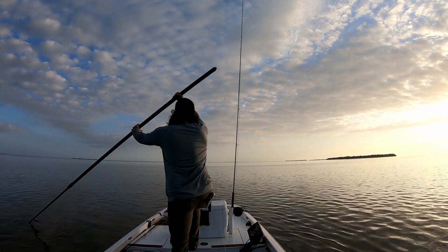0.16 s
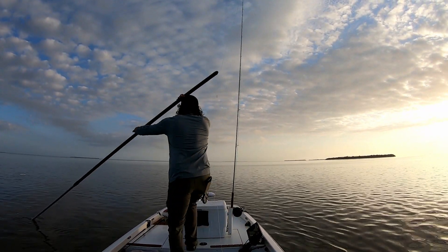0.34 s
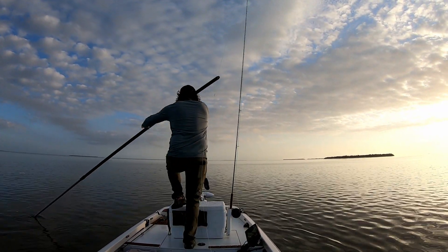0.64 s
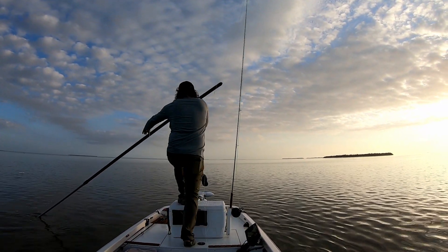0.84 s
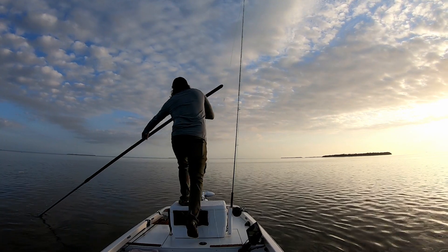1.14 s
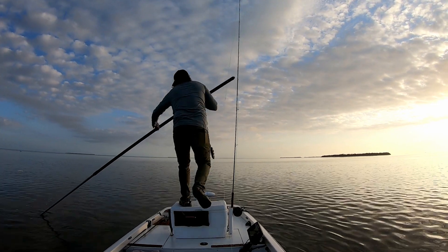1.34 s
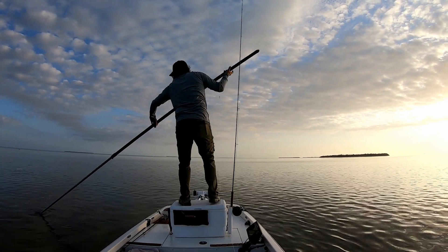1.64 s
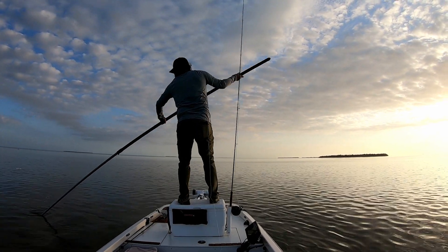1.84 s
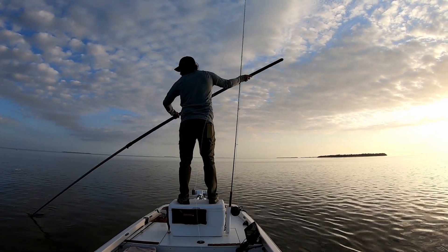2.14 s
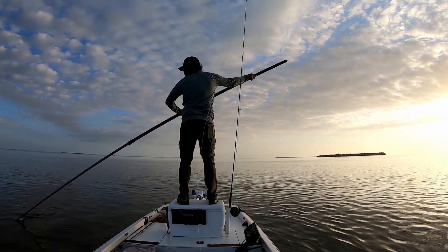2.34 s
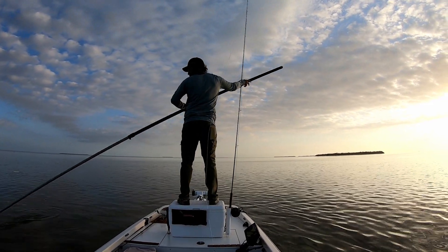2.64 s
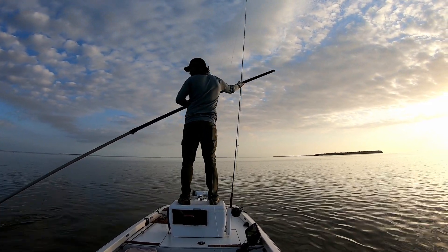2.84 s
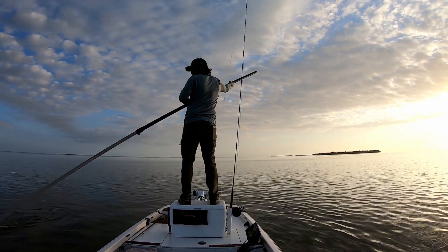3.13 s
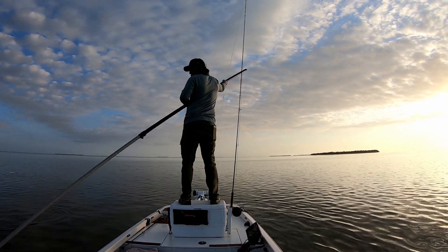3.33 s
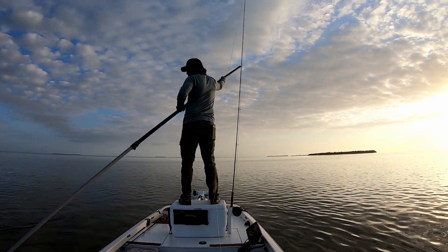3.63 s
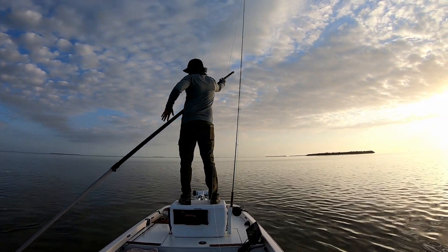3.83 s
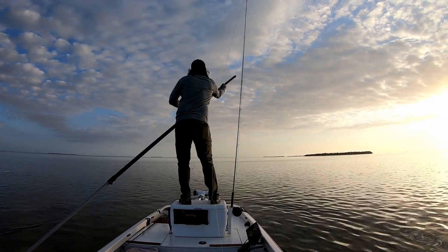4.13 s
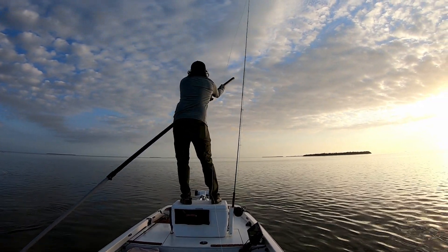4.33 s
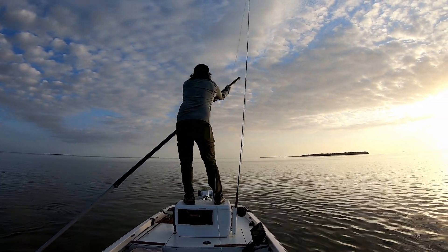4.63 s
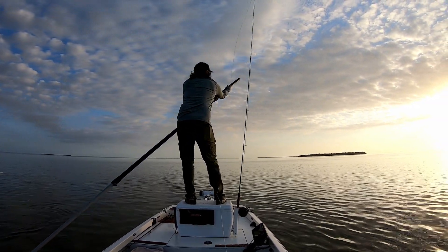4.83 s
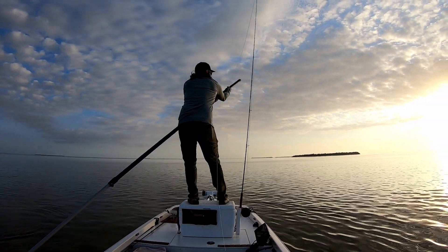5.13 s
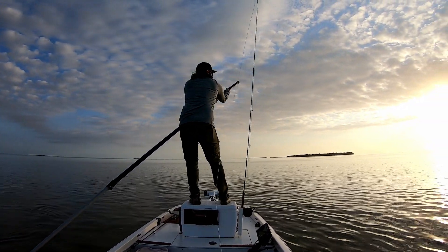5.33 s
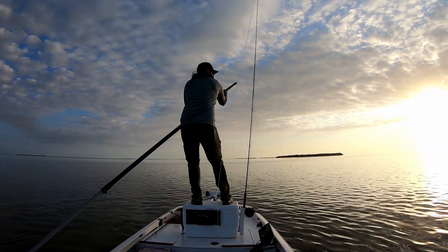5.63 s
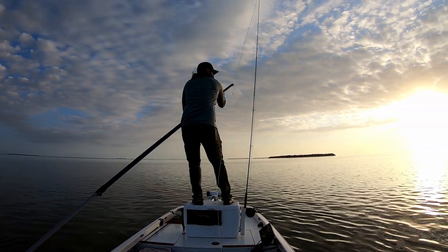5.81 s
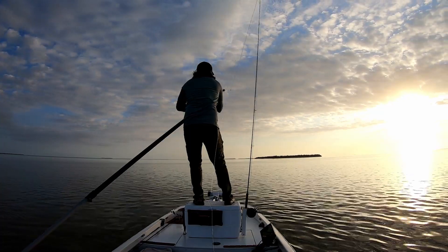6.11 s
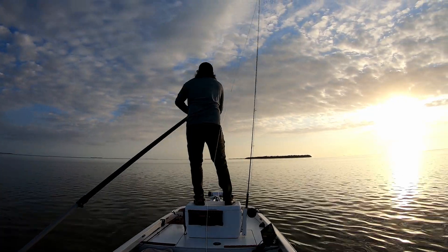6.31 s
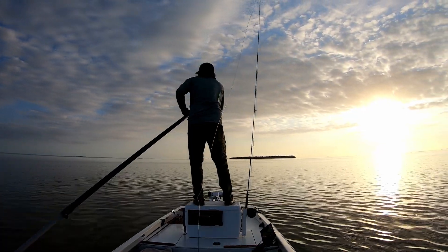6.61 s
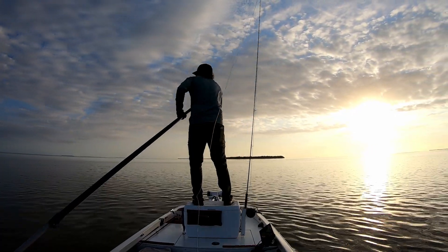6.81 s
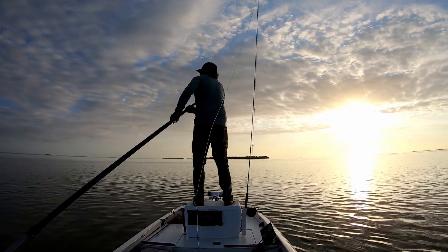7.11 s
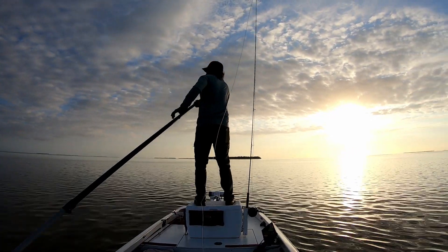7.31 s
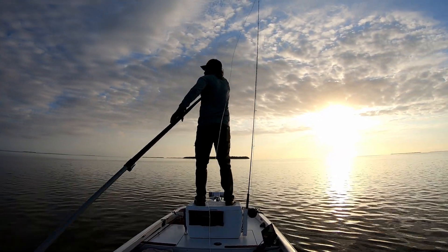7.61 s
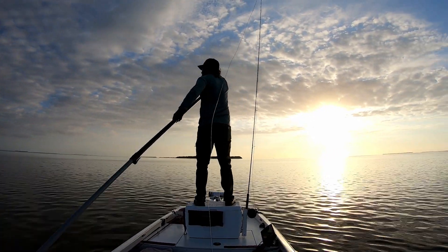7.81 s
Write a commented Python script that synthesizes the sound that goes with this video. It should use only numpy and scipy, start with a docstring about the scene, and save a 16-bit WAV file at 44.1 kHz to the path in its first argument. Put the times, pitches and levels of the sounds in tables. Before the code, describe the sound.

On a poled skiff, feet scuff and thud over booming rumble, wavelets slap and gurgle, then sudden near-quiet, trickling water and one hull knock.

```python
"""Skiff poled over calm shallows

A loud rumble with a hollow hull boom, both filtered noise, and splashing; then abruptly a much quieter rumble.
Feet thump, scuff and creak up onto the platform: noise forces drive damped modes, and slipping is coloured noise.
Wavelets slap and gurgle under the bow, drops fall and water trickles as the boat gathers way; bubbles are
decaying sines of rising pitch. Near the end a hard knock rings the hull and its frame.
"""
import sys
import numpy as np
from scipy import signal
from scipy.fft import rfft, irfft
from scipy.io import wavfile
from scipy.ndimage import uniform_filter1d

SR = 44100
rng = np.random.default_rng(int(sys.argv[2]) if len(sys.argv) > 2 else 0)


def unload_audio(sound):
    """Save the sound as a 16-bit wav file, at the path given as the first command line argument."""
    columns = np.transpose(np.atleast_2d(sound))
    # keep every value between -1 and 1, then stretch to whole-number steps
    steps = np.round(np.clip(columns, -1, 1) * 32767)
    wavfile.write(sys.argv[1], SR, steps.astype(np.int16))


N = 351036
TIME = np.arange(N) / SR
DROP_S = 3.962  # the rumble, hiss and splashing drop abruptly here

# spectrum of soles and hands slipping on grit: f/Hz, level/dB
GRIT_SPECTRUM = [(350, -47.5), (600, -13), (1100, -2.5), (1480, -4.5), (1760, -3), (2470, -9), (2750, -5.5),
                 (3700, -6), (4460, -11.5), (6510, -22), (8290, -22), (8750, -20), (15000, -44.5)]
# spectrum of spray and its smallest bubbles: f/Hz, level/dB
SPRAY_SPECTRUM = [(900, -13.5), (1500, -8), (2200, -2.5), (3200, 2), (4600, -5), (5400, -16.5),
                  (6300, -6.5), (8000, -23), (10400, -9.5), (13000, -31.5), (15000, -38)]
# the pole stirring the water: t/s, length/s, relative bubbling level/dB, relative spray level/dB
SPLASHES = [(1.867, 0.012, -38, -42.5), (2.103, 0.11, -47.5, -51.5), (2.403, 0.017, -41, -45),
            (2.513, 0.0058, -35.5, -39.5), (2.534, 0.15, -35, -40.5), (2.644, 0.0066, -42, -39.5),
            (2.816, 0.079, -44.5, -48), (3.453, 0.056, -60, -46.5), (3.602, 0.14, -33.5, -34.5)]
# one hard knock on the hull: t/s, relative boom level/dB, relative slap level/dB
KNOCK = (7.881, -13.5, -13)


def undb(db):
    """Amplitude ratio of a level difference in decibels."""
    return 10 ** (np.asarray(db) / 20)


def unit(x):
    """Normalise by the standard deviation, so that a zero-mean signal has rms 1."""
    return x / (np.std(x) + 1e-12)


def peaked(x, db):
    """Normalise to a given peak level in dB re full scale."""
    return x * undb(db) / (np.abs(x).max() + 1e-12)


def onset_rms(x):
    """Short-time rms of the loudest 20 ms."""
    power = uniform_filter1d(x * x, size=SR // 50, mode="constant")
    return np.sqrt(power.max())


def add(out, s, x):
    """Superpose x on out from time s, in place."""
    i = max(int(s * SR), 0)
    out[i:i + len(x)] += x[:max(N - i, 0)]


def colour(x, points):
    """Spectral shaping through (f/Hz, level/dB) points, falling away beyond both ends."""
    hz, db = np.transpose(points)
    log_f = np.log(np.maximum(np.arange(len(x) // 2 + 1) * SR / len(x), 1))
    beyond = np.maximum(np.log(hz[0]) - log_f, 0) + np.maximum(log_f - np.log(hz[-1]), 0)
    gain = undb(np.interp(log_f, np.log(hz), db) - 20 * beyond)
    return irfft(rfft(x) * gain, len(x))


def band(x, hz, width):
    """A single second-order resonance with unit gain at its centre."""
    hz = min(hz, .4 * SR)
    b, a = signal.iirpeak(hz, hz / min(width, SR / 4), fs=SR)
    return signal.lfilter(b, a, x)


def passband(low_hz, high_hz, order):
    """Butterworth band-pass sections, maximally flat between the two edges."""
    return signal.butter(order, [low_hz, high_hz], "band", fs=SR, output="sos")


def lowpass(x, order, top_hz):
    """Butterworth low-pass: energy above the cutoff is attenuated."""
    return signal.sosfilt(signal.butter(order, top_hz, fs=SR, output="sos"), x)


def fade(t, t60):
    """Exponential free decay, losing 60 dB in t60."""
    return np.exp(-np.log(1000) * t / t60)


def walk(rate):
    """Slow random modulation of unit spread: steps at the given rate per second, smoothed twice."""
    k = int(SR / rate)
    steps = np.repeat(rng.standard_normal(N // k + 1), k)
    smooth = uniform_filter1d(uniform_filter1d(steps, k), k)
    return unit(smooth[:N])


def swell(start, length, rise_db_per_s, fall_db_per_s):
    """Envelope in dB, exponential in amplitude: a steady rise, a hold at 0, a steady fall."""
    before = np.maximum(start - TIME, 0)
    after = np.maximum(TIME - start - length, 0)
    return -rise_db_per_s * before - fall_db_per_s * after


def bubble(hz, t60, rise):
    """Bubble resonance: a damped sine whose pitch climbs by the share rise as it nears the surface."""
    t = np.arange(int(t60 * SR) + 2) / SR
    phase = 2 * np.pi * hz * t * (1 + rise * t / t60 / 2)
    return np.sin(phase) * fade(t, t60) * (1 - np.exp(-t * hz / 1.4))


def bubbles(rate, low_hz, high_hz, cycles, spread_db, rise):
    """Random superposition of bubbles of many sizes, each pitched by its size; rms 1."""
    out = np.zeros(N)
    for when, size, life, loud in rng.random((int(rate * N / SR), 4)):
        hz = low_hz * (high_hz / low_hz) ** size
        ring = bubble(hz, cycles * (.5 + life) / hz, rise)
        add(out, when * N / SR, undb(spread_db * loud ** 2) * ring)
    return unit(out)


def struck(hz, t60):
    """Impulse response of one low mode, swinging up and dying away."""
    t = np.arange(SR) / SR
    return np.sin(2 * np.pi * hz * t) * fade(t, t60) * (1 - np.exp(-t * hz))


def air(quieter):
    """Broadband hiss of air and far ripples: it settles exponentially and drops together with the rumble."""
    # f/Hz, level/dB
    hiss_spectrum = [(400, -13), (750, 2), (1060, -3.5), (1900, -4), (2600, -7.5), (4400, -7), (5400, -18),
                     (10500, -22), (13400, -38.5), (15000, -51)]
    first_db, steady_db, later_db = -45, -57.5, -69
    settle_s = 2.1  # time constant
    early_db = steady_db + (first_db - steady_db) * np.exp(-TIME / settle_s)
    gain = (1 - quieter) * undb(early_db) + quieter * undb(later_db)
    hiss = unit(colour(rng.standard_normal(N), hiss_spectrum))
    return gain * undb(walk(36)) * hiss  # flickers by about 1 dB


def wind(quieter):
    """Turbulent buffeting as low-pass noise; the hollow hull booms along on one narrow resonance."""
    # louder first rumble: f/Hz, level/dB
    first_spectrum = [(15, -6.5), (35, -7.5), (57, 3), (76, -5.5), (97, -2), (120, -12), (165, -4.5),
                      (200, -17.5), (260, -21.5), (400, -31.5), (800, -47.5), (2000, -68.5)]
    # quieter later rumble: f/Hz, level/dB
    later_spectrum = [(20, -24), (48, 2), (60, -2.5), (75, -6), (95, -3.5), (120, -9), (160, -8),
                      (205, -15), (280, -20.5), (400, -33), (700, -44)]
    # gusts: centre t/s, length/s, swell/dB
    gust_rows = [(.3, 0.09, 4), (0.497, 0.17, 3.5), (1.904, 0.23, 4.5), (3.007, 0.23, 4.5),
                 (3.673, 0.085, 3), (4.773, 0.3, 7), (5.803, 0.32, 3), (7.447, 0.35, 3.5)]
    first_db, later_steady_db = -24.5, -38.5
    dip_db, rise_s = 2.5, 0.98  # the later rumble starts lower, then rises slightly
    boom_hz, pass_width_hz = 144, 18
    boom_db, later_boom_db = -6, -2  # boom relative to rumble, and what the later rumble adds to that

    gusts_db = sum(db * np.exp(-(2 * (TIME - s) / length) ** 2) for s, length, db in gust_rows)
    later_db = later_steady_db - dip_db * np.exp(-(np.maximum(TIME - DROP_S, 0) / rise_s) ** 2)
    level_db = (1 - quieter) * first_db + quieter * later_db + gusts_db + 0.98 * walk(8.3)
    first = unit(colour(rng.standard_normal(N), first_spectrum))
    later = unit(colour(rng.standard_normal(N), later_spectrum))
    rumble = (1 - quieter) * first + quieter * later
    boom = band(rng.standard_normal(N), boom_hz, pass_width_hz)
    boom = unit(band(boom, boom_hz, pass_width_hz))
    return undb(level_db) * (rumble + undb(boom_db + later_boom_db * quieter) * boom)


def pings(rate):
    """Sparse bubble resonances: the nearest stand out singly as short rising chirps; rms 1."""
    return bubbles(rate, low_hz=900, high_hz=4800, cycles=42, spread_db=13, rise=.25)


def crackle(rate=170, spread_db=20, centre_hz=8000, width_hz=6000, t60=0.011):
    """Skins of tiny bubbles snap: random impulses, each a decaying noise burst; rms 1."""
    t = np.arange(int(SR / 50)) / SR
    snaps = (rng.random(N) < rate / SR) * undb(spread_db * rng.random(N) ** 3)
    bursts = signal.fftconvolve(snaps, fade(t, t60))[:N] * rng.standard_normal(N)
    return unit(band(colour(bursts, SPRAY_SPECTRUM), centre_hz, width_hz))


def trickle():
    """Flow noise along the moving hull: bubbles in spurts, with fizz and crackle growing fastest."""
    # large, middling and small bubbles: rate/(1/s), lowest f/Hz, highest f/Hz, relative level/dB
    rivulets = [(139, 223, 556, -2.5), (320, 517, 1176, -0.5), (560, 1060, 2580, -4)]
    start_s, push_top_s = 5.5, 7.406  # grows louder up to the top of the push
    level_db, churn_db, patchy_db = -39, 2.5, 3
    froth_db, ping_db, mist_db = -7, -9, -7
    fizz_db, fizz_growth, fizz_top_hz = -9.5, 1.18, 5800  # growth: exponent on the flow
    crackle_db, crackle_growth = -20, 2.2

    flow = undb(swell(push_top_s, 0, rise_db_per_s=16.5, fall_db_per_s=14))
    flow = flow * np.clip((TIME - start_s) / .1, 0, 1)

    burble = np.zeros(N)
    for rate, low_hz, high_hz, db in rivulets:
        spurts = undb(db + patchy_db * walk(16))
        burble += spurts * bubbles(rate, low_hz, high_hz, cycles=22, spread_db=17.5, rise=0.33)
    froth = unit(band(band(rng.standard_normal(N), 570, 800), 800, 1800))
    burble = unit(unit(burble) + undb(froth_db) * froth)
    burble = unit(burble + undb(ping_db) * pings(rate=75))

    fizz = bubbles(rate=2100, low_hz=1590, high_hz=12810, cycles=34, spread_db=25, rise=0.14)
    fizz = unit(fizz * undb(patchy_db * walk(25)))
    fizz = colour(fizz + undb(mist_db) * rng.standard_normal(N), SPRAY_SPECTRUM)
    fizz = unit(lowpass(fizz, 1, fizz_top_hz))

    rush = flow * burble
    rush += undb(fizz_db) * flow ** fizz_growth * fizz
    rush += undb(crackle_db) * flow ** crackle_growth * crackle()
    return undb(level_db + churn_db * walk(40)) * rush


def laps(count=10, scatter=0.21, cycles=28, rise=0.18):
    """A folding ripple entrains air: a cluster of like-sized bubbles that slides in pitch."""
    # ripples lapping along the hull: t/s, f/Hz, glide/octaves, peak level/dB
    ripples = [(1.875, 455, -0.51, -15.5), (1.93, 653, 0.24, -32), (2.04, 428, 0.042, -30),
               (2.098, 2280, 0.41, -18.5), (2.15, 445, -0.13, -32), (2.398, 1270, 0.56, -21.5),
               (2.522, 580, -.3, -12.5), (2.994, 402, .3, -18), (3.33, 503, 0.32, -35.5),
               (3.582, 1840, 0.42, -20.5), (5.49, 1590, 0.12, -54), (5.535, 636, 0.066, -48.5),
               (5.562, 1130, -.3, -39.5), (5.725, 800, 0.087, -53), (5.838, 1100, -0.39, -49),
               (5.935, 1655, -.3, -52), (6.0, 1450, .2, -48), (6.095, 1110, -0.08, -43.5),
               (6.15, 867, -0.021, -34), (6.24, 546, -0.59, -42), (6.29, 442, -0.52, -36.5),
               (6.30, 980, .3, -39.5), (6.44, 900, -0.26, -43.5), (6.50, 546, -0.12, -43.5),
               (6.53, 1400, 0.84, -41), (6.62, 1085, 0.65, -34.5), (6.768, 526, 0.039, -33.5),
               (6.85, 825, -0.078, -43), (7.415, 2090, -0.34, -27), (7.62, 1080, 0.3, -34)]
    fold_s = .062  # time a ripple takes to fold
    out = np.zeros(N)
    for s, hz, glide, db in ripples:
        cluster = np.zeros(N)
        for when, size, loud in rng.random((count, 3)):
            pitch = hz * np.exp(scatter * (2 * size - 1)) * 2 ** (glide * (when - .5))
            weight = loud * np.sin(np.pi * when)
            add(cluster, when * fold_s, weight * bubble(pitch, cycles / pitch, rise))
        add(out, s, peaked(cluster, db))
    return out


def droplets(t60=0.023, width_hz=2200, ring_db=-2, cycles=40, rise=0.26):
    """Impact noise and bubble resonance: tiny drops tick on the surface, each with a brief ping."""
    # t/s, tick peak level/dB, f/Hz
    tiny_drops = [(2.2805, -38, 5700), (3.206, -39, 5960), (3.2432, -38, 4630), (3.3583, -32.5, 5000),
                  (3.439, -33, 4700), (3.4646, -26.5, 4720), (3.476, -30, 6000), (3.4846, -30.5, 3610),
                  (3.512, -30, 5900), (3.534, -32, 3970), (3.5445, -28, 3630), (3.5613, -24.5, 3370),
                  (3.6926, -19.5, 3930), (5.6382, -52.5, 5500), (5.7044, -57, 5500), (6.2905, -51, 5400),
                  (6.864, -51, 7540), (7.4225, -37, 6440)]
    out, t = np.zeros(N), np.arange(int(SR / 10)) / SR
    for s, db, hz in tiny_drops:
        tick = colour(rng.standard_normal(len(t)), SPRAY_SPECTRUM) * fade(t, t60)
        add(out, s, peaked(band(tick, hz, width_hz), db))
        add(out, s, peaked(bubble(hz, cycles / hz, rise), db + ring_db))
    return out


def drops(rise=0.4, ring_db=1, splat_db=-4, splat_t60=0.011):
    """Impact noise and bubble resonance: a drop splats on the surface and leaves a ringing bubble."""
    # single drops and bubbles: t/s, relative level/dB, f/Hz
    single_drops = [(.775, -31, 2770), (1.522, -22, 2840), (1.8628, -20.5, 1470), (1.879, -20.5, 1460),
                    (2.056, -34, 1780), (2.085, -35, 1450), (2.158, -38, 2350), (2.165, -34, 1360),
                    (2.211, -26.5, 1880), (2.245, -36.5, 2230), (2.271, -38.5, 1250), (2.277, -36, 2800),
                    (2.299, -35, 2480), (2.317, -37, 1100), (2.419, -23, 1273), (2.446, -26, 1165),
                    (2.5142, -21.5, 1440), (2.645, -31, 1230), (3.512, -42, 1770), (3.575, -22, 357),
                    (3.594, -22, 1510), (3.6063, -22, 1780), (3.6397, -26, 1150), (3.6757, -21.5, 2140),
                    (3.732, -18.5, 3700), (3.7398, -11, 2500), (3.767, -19.5, 1224), (3.774, -19, 3060),
                    (3.7882, -16, 2060), (3.818, -26.5, 1440), (3.854, -18, 2400), (3.909, -26.5, 1950),
                    (6.783, -39.5, 1930), (7.0788, -41, 3450), (7.196, -40, 2100), (7.467, -39, 1900),
                    (7.655, -36, 2400), (7.748, -31.5, 1460)]
    cycles = 31  # a bubble dies away in this many cycles of its first pitch
    out, t = np.zeros(N), np.arange(int(SR / 10)) / SR
    for s, db, hz in single_drops:
        burst = rng.standard_normal(len(t)) * fade(t, splat_t60)
        splat = band(band(burst, hz, hz), hz, 2 * hz)
        add(out, s, peaked(splat, db + splat_db))
        ring = bubble(hz, cycles / hz, rise * rng.uniform(0.22, 1))
        add(out, s, peaked(ring, db + ring_db))
    return out


def gurgles(waver=0.027, rough_db=3, gain_db=-0.5):
    """Cavity resonance: an air pocket trapped under the bow climbs in pitch as the water closes it."""
    # t/s, length/s, resting f/Hz, pitch gained on closing/share of it, relative level/dB, fade/dB
    pockets = [(2.445, 0.034, 400, 0.33, -24, 5), (2.487, 0.016, 620, 0.23, -20, 6),
               (2.5, 0.031, 442, 0.57, -17, 3.5), (2.592, .03, 750, 0.29, -28, 13),
               (2.597, .048, 530, 0.22, -23.5, 17), (2.633, .022, 850, .6, -36, -3),
               (2.654, 0.028, 537, .3, -32, 4), (3.135, 0.048, 497, 2.67, -27, -7),
               (3.571, 0.041, 360, .15, -25, 5), (3.619, .086, 312, 2.5, -25.5, -5.5),
               (3.77, .14, 355.6, 2.8, -19.5, 22.5)]
    close_s = .021  # time constant of the closing
    attack_s, release_s = 0.0017, 0.0051
    out, wobble, flutter = np.zeros(N), walk(150), walk(200)
    for s, length, rest_hz, rise, db, fade_db in pockets:
        u = np.linspace(0, 1, int(length * SR))
        here = int(s * SR) + np.arange(len(u))
        closing = 1 + rise * np.exp((u - 1) * length / close_s)
        hz = rest_hz * closing * (1 + waver * wobble[here])
        edges = np.clip(np.minimum(u * length / attack_s, (1 - u) * length / release_s), 0, 1)
        size = undb(db + gain_db - fade_db * u + rough_db * flutter[here]) * edges
        add(out, s, size * np.sin(2 * np.pi * np.cumsum(hz) / SR))
    return out


def foam(centre_hz=7500, width_hz=5000):
    """Bursting of the smallest bubbles, swelling and dying more slowly than the spray itself."""
    foam_db = -26  # relative to the spray column
    fizz = bubbles(rate=900, low_hz=5400, high_hz=12900, cycles=32, spread_db=22, rise=.03)
    amount = np.zeros(N)
    for s, length, _, spray_db in SPLASHES:
        envelope_db = swell(s, length, rise_db_per_s=70.5, fall_db_per_s=28.5)
        amount += undb(spray_db + foam_db + envelope_db)
    return amount * unit(band(fizz, centre_hz, width_hz))


def wash(bubbling_db=1, froth_db=-6, mist_db=-5, churn_db=3.0):
    """Air entrained by stirring: large bubbles burble, tiny ones fizz over a churning froth."""
    large = bubbles(rate=950, low_hz=518, high_hz=2567, cycles=23.3, spread_db=15.5, rise=0.33)
    froth = unit(band(band(rng.standard_normal(N), 530, 1500), 560, 1900))
    large = unit(large + undb(froth_db) * froth)
    tiny = bubbles(rate=2000, low_hz=1515, high_hz=14000, cycles=32, spread_db=26, rise=0.097)
    tiny = unit(colour(tiny + undb(mist_db) * rng.standard_normal(N), SPRAY_SPECTRUM))
    out = np.zeros(N)
    for s, length, low_db, high_db in SPLASHES:
        stirring = undb(swell(s, length, rise_db_per_s=217, fall_db_per_s=142.5))
        out += stirring * (undb(low_db + bubbling_db) * large + undb(high_db) * tiny)
    return out * undb(churn_db * walk(70))


def deck(x, t60=0.1, wet_db=-7):
    """Diffuse scattering: deck and gunwales add a very short decaying tail, by convolution with noise."""
    t = np.arange(int(SR / 5)) / SR
    tail = rng.standard_normal(len(t)) * fade(t, t60) * (1 - np.exp(-t / 0.00067))
    return x + undb(wet_db) * signal.fftconvolve(x, tail / np.linalg.norm(tail))[:N]


def drags(grit_db=4.0):
    """Sliding friction of soles and clothing: coloured noise roughened as grit catches and lets go."""
    # t/s, length/s, level/dB
    slides = [(0.357, 0.26, -43), (0.83, 0.098, -37), (1.105, 0.055, -39), (1.144, 0.23, -35),
              (4.02, 0.13, -53), (4.44, 0.48, -63), (7.861, 0.032, -33.5)]
    out = np.zeros(N)
    grit = unit(colour(rng.standard_normal(N), GRIT_SPECTRUM) * undb(grit_db * walk(220)))
    for s, length, db in slides:
        pressure = signal.windows.tukey(int(length * SR), .5)
        add(out, s, undb(db) * pressure * grit[int(s * SR):][:len(pressure)])
    return out


def scuffs(grit_db=5, rise_s=0.0016, t60=.048, gain_db=1):
    """Brief slipping friction: gritty noise bursts, each through a broad resonance of its own."""
    # scuffs and ticks of shoes, hands and pole: t/s, relative peak level/dB, centre f/Hz
    slips = [(0.212, -26, 1520), (0.405, -25, 1500), (0.46, -31, 1620), (.773, -28, 2900),
             (0.827, -19.5, 2100), (.859, -20.5, 2000), (0.8837, -26, 2000), (1.161, -12.5, 1830),
             (1.173, -7.5, 1480), (1.208, -8.5, 2870), (1.226, -17, 3940), (1.237, -26, 3000),
             (1.247, -16, 1960), (1.254, -26, 1600), (1.265, -19, 1900), (1.321, -34, 800),
             (1.3395, -20, 1590), (1.521, -23, 2920), (2.1114, -16.5, 2000), (2.208, -31, 1900),
             (2.383, -18, 1980), (2.8035, -21.5, 4300), (4.046, -32, 3160), (4.138, -38, 2650),
             (4.4636, -46, 3000), (4.5022, -35, 3440), (4.6645, -42.5, 3250), (4.727, -42, 3000),
             (4.789, -34.5, 3600), (6.8399, -35.5, 2020), (6.9918, -24.5, 3060)]
    out, t = np.zeros(N), np.arange(int(SR / 4)) / SR
    grit = colour(rng.standard_normal(N), GRIT_SPECTRUM) * undb(grit_db * walk(350))
    for s, db, hz in slips:
        slip = grit[int(s * SR):][:len(t)] * fade(t, t60) * (1 - np.exp(-t / rise_s))
        add(out, s, peaked(band(slip, hz, 1.3 * hz), db + gain_db))
    return out


def creak(broad_db=-3, width_scale=1.9, top_hz=8500):
    """Friction under the foot drives the platform's resonances: a quick run of slips swells and dies."""
    # t/s, length/s, peak level/dB
    s, length, db = (1.279, 0.02, 0)
    # platform resonances: f/Hz, nominal width/Hz, relative level/dB
    platform = [(1860, 84, -1.5), (2720, 160, -9), (3200, 68, -7.5), (4360, 68, -1.5), (6240, 110, -9.5),
                (7880, 110, -6), (9180, 130, -12.5)]
    out, slips = np.zeros(N), np.zeros(4096)
    window = signal.windows.hann(int(length * SR))
    slips[:len(window)] = window * rng.standard_normal(len(window))
    ring = sum(undb(g) * band(slips, f, width_scale * w) for f, w, g in platform)
    sound = unit(ring) + undb(broad_db) * unit(colour(slips, GRIT_SPECTRUM))
    add(out, s, peaked(lowpass(sound, 3, top_hz), db))
    return out


def blows():
    """Impact excitations of the hull: (t/s, boom/dB, slap/dB, crack/dB, nominal t60/s), levels relative."""
    # feet landing on deck and platform: t/s, relative boom level/dB, relative slap level/dB
    footfalls = [(.256, -31.5, -41), (.286, -34.5, -32.5), (.366, -32, -37), (.461, -24.5, -29),
                 (1.016, -25, -37.5), (1.052, -30.5, -32), (1.132, -19.5, -28.5), (1.174, -23, -23.5),
                 (1.21, -29.5, -37), (1.27, -28.5, -43.5), (1.319, -26.5, -41.5), (1.348, -29.5, -44),
                 (4.726, -38.5, -43.5), (4.790, -33.5, -35.5)]
    # wavelets slapping under the bow: t/s, relative boom level/dB, relative slap level/dB
    wavelets = [(1.864, -22, -30.5), (1.886, -12.5, -20.5), (2.382, -16.5, -25), (2.445, -27, -30),
                (2.538, -13, -18.5), (2.597, -25, -35), (2.690, -17.5, -21), (2.836, -19.5, -24.5),
                (2.887, -23, -35.5), (2.961, -19.5, -25.5), (3.049, -27.5, -37), (3.133, -29, -38.5),
                (3.392, -38, -38.5), (3.575, -27, -49.5)]
    # rows, crack relative to slap/dB, nominal t60/s
    kinds = [(footfalls, -5.5, .14), (wavelets, -11.5, 0.11), ([KNOCK], -3.5, 0.22)]
    return [(s, boom_db, slap_db, slap_db + crack_db, t60)
            for rows, crack_db, t60 in kinds
            for s, boom_db, slap_db in rows]


def flex(hz=60, t60=0.95, rel_db=-6):
    """Bending mode: every blow also flexes the whole hull in a slow deep throb."""
    out = np.zeros(N)
    for s, boom_db, *_ in blows():
        add(out, s, undb(boom_db + rel_db) * struck(hz, t60))
    return out


def thuds():
    """Low modes set ringing: the knock shakes the hull's frame, the first step up booms the platform's lid."""
    # frame modes that only the knock reaches: f/Hz, level/dB, t60/s
    frame = [(76, -13.5, 1.2), (169, -7.5, 0.34), (349, -14.5, .22), (440, -12, 0.27), (1045, -9, 0.069)]
    lid_step_s, lid_db = 1.015, -10.5
    out = np.zeros(N)
    add(out, lid_step_s, undb(lid_db) * struck(hz=218, t60=0.25))
    add(out, KNOCK[0], sum(undb(g) * struck(f, d) for f, g, d in frame))
    return out


def hull(direct=40, push=5):
    """Forced modal vibration: the low boom outlasts the slap, and the crack dies first."""
    # hull modes: nominal f/Hz, relative level/dB, t60/s
    modes = [(172.5, 0.5, 0.063), (213.5, -4, 0.27), (253.7, 0.5, 0.12), (303.3, -7, 0.16),
             (338, -6.5, .14), (400, 1, 0.11), (429, 2, 0.12), (479, -1, 0.068), (615.3, -4, 0.16),
             (683, -2, 0.092), (766, -1, 0.07), (830, -6.5, 0.056), (966, -6, 0.082), (1140, -0.5, 0.033),
             (1250, -4.5, 0.05), (1590, -6, 0.12), (1860, -10, 0.047)]
    # boom, slap and crack: filter, scale on the force's decay time, trim/dB
    registers = [(passband(160, 350, order=4), 1.5, 0.5),
                 (passband(380, 905, order=3), 1, 0),
                 (passband(920, 2500, order=2), 0.9, 0)]
    out, t = np.zeros(N), np.arange(int(SR / 2)) / SR
    for s, *levels_db, t60 in blows():
        detune = 1 + 0.035 * rng.standard_normal(len(modes))  # each blow finds slightly other pitches
        ring = sum(undb(g) * np.cos(2 * np.pi * f * k * t) * fade(t, d)
                   for (f, g, d), k in zip(modes, detune))
        ring[0] += direct  # the contact itself is heard beside the modes
        for db, (sos, lasting, trim_db) in zip(levels_db, registers):
            force = rng.standard_normal(len(t)) * fade(t, t60 * lasting / 1.4)
            force[0] += push
            sound = signal.sosfilt(sos, signal.fftconvolve(force, ring)[:len(t)])
            add(out, s, sound * undb(db + trim_db) / onset_rms(sound))  # level of the loudest 20 ms
    return out


def scene():
    """Superposition of wind, boat and water; the splashing stops at the same instant as the rumble drops."""
    quieter = np.clip((TIME - DROP_S) / 0.004 + .5, 0, 1)
    splashing = (1 - quieter) * (wash() + foam())
    water = drops() + droplets() + gurgles() + laps() + trickle() + splashing
    boat = hull() + flex() + thuds() + scuffs() + drags() + creak()
    return (wind(quieter) + air(quieter) + boat + deck(water))[None]


def record(dry):
    """Amplitude and band limiting: clipping at full scale, then a steep low-pass."""
    top_hz = 15500
    sos = signal.ellip(8, .2, 70, top_hz, fs=SR, output="sos")
    return signal.sosfilt(sos, np.clip(dry, -1, 1))


dry = scene()
out = record(dry)
unload_audio(out)
```